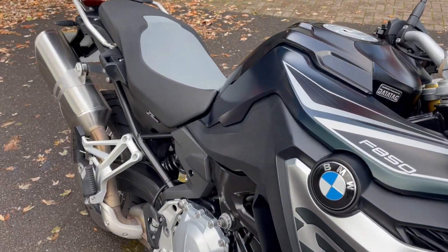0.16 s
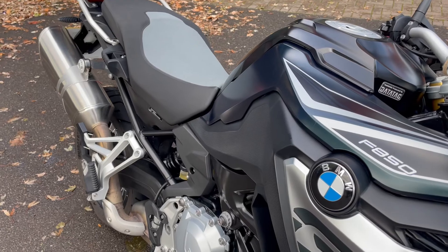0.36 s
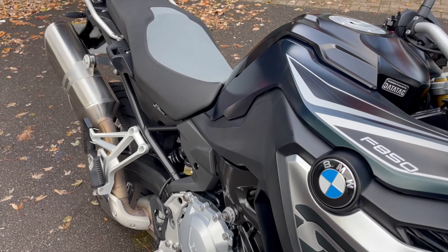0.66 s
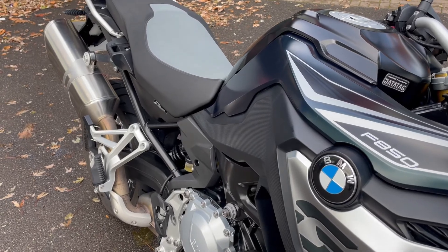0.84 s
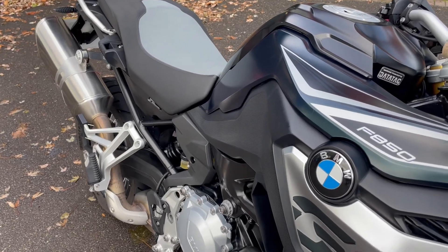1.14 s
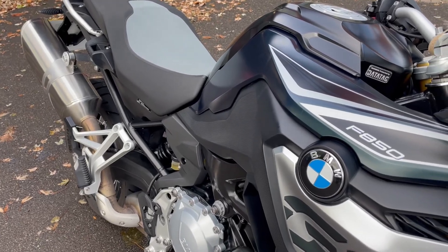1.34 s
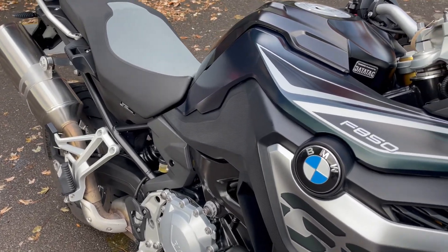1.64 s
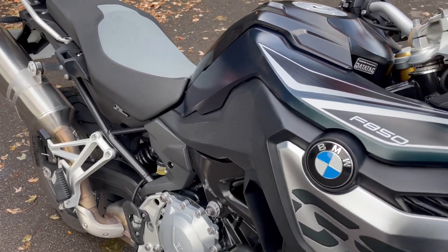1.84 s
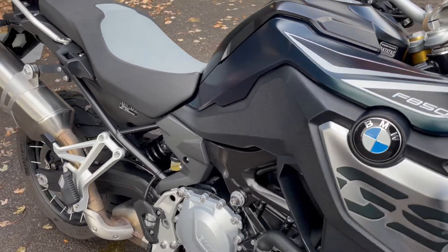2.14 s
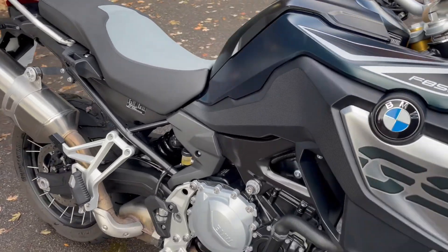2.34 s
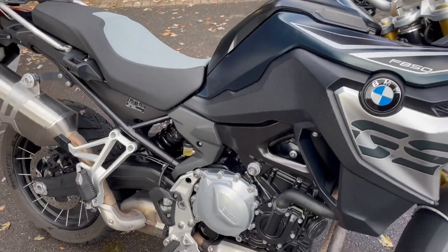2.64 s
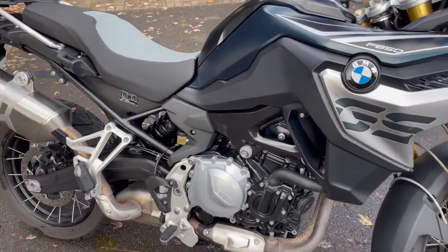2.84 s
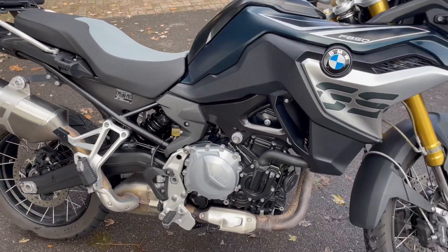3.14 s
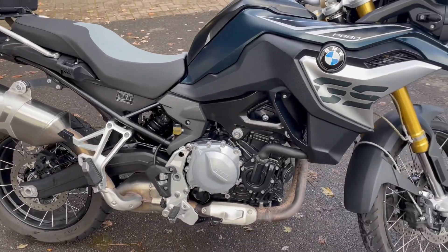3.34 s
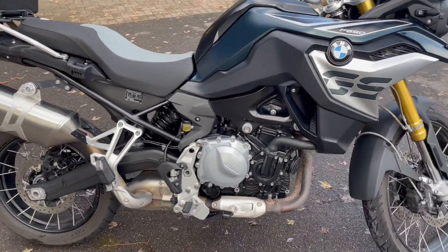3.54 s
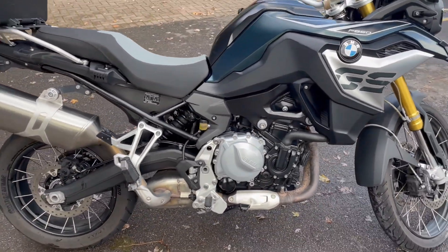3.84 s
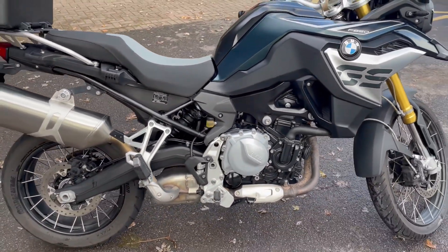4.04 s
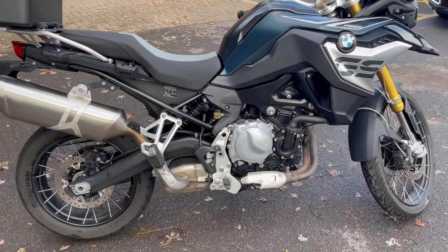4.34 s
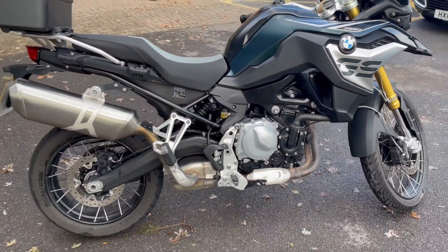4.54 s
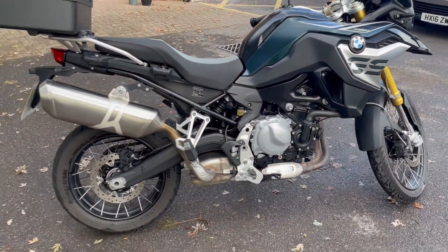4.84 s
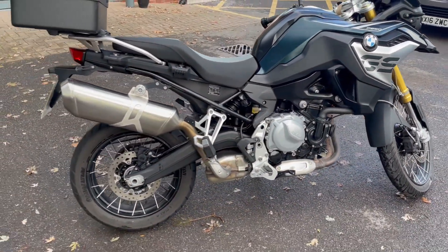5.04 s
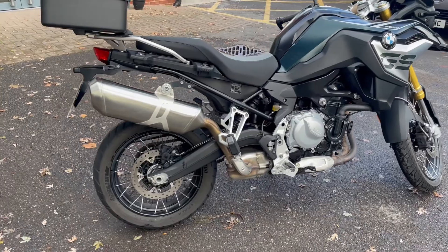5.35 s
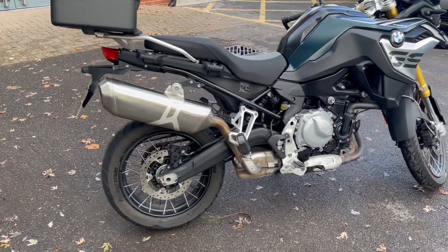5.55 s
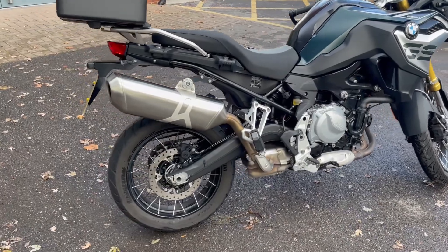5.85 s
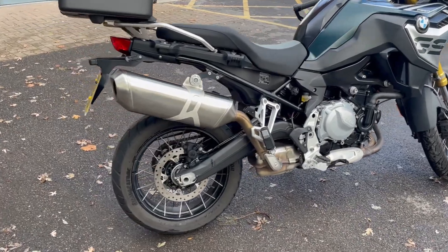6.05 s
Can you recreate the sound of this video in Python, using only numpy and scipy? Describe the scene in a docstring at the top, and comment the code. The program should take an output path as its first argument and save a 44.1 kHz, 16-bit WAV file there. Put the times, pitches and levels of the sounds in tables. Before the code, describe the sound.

Close outdoor motorcycle engine: two throaty revs in the first two seconds, falling back to uneven, thumping idle with metallic clatter and late faint squeals.

```python
"""A twin-cylinder motorcycle engine with uneven firing runs low, is blipped twice and falls back to idle.
Exhaust blows ring the silencer, intake gulps the airbox and metal contacts the casing; gas puffs gate a hiss.
Three sharp spits accompany the blips and the fall of the revs, over a steady street noise.
As the listener steps back the casing changes colour and hollow bands of noise slide upward.
Late on, a thin fluttering squeal sounds twice from far away. Two close microphone ports listen throughout."""
import sys
import numpy as np
from scipy import signal
from scipy.fft import rfft, irfft, next_fast_len
from scipy.io import wavfile
from scipy.ndimage import uniform_filter1d

SR = 44100
rng = np.random.default_rng(int(sys.argv[2]) if len(sys.argv) > 2 else 0)


def wav_out(sig):
    """Save sig, one row per channel (or a flat mono array), as 16-bit PCM at SR to the path in sys.argv[1]."""
    wavfile.write(sys.argv[1], SR, np.round(np.clip(np.atleast_2d(sig).T, -1, 1) * 32767).astype(np.int16))


def makeup_ratio(level_db):
    """Linear amplitude ratio for a level in decibels (20 dB per factor of ten)."""
    decades = np.asarray(level_db, float) / 20
    return 10 ** decades


N = 272979
T = np.arange(N) / SR   # s

# crankshaft speed: (time [s], speed [turns per minute])
CRANK_SPEED = [(0.0, 1253.0), (0.12, 1242.0), (0.21, 1862.0), (0.301, 2495.0), (0.399, 3590.0),
               (0.583, 3075.0), (0.75, 2645.0), (1.053, 1688.0), (1.117, 2796.0), (1.279, 5073.0),
               (1.363, 5060.0), (1.45, 4543.0), (1.55, 4255.0), (1.745, 3568.0), (1.9, 2966.0),
               (2.05, 2462.0), (2.214, 1816.0), (2.541, 1334.0), (2.713, 1268.0), (3.397, 1324.0),
               (3.714, 1264.0), (4.014, 1274.0), (4.558, 1200.0), (4.74, 1252.0), (5.009, 1211.0),
               (5.234, 1228.0), (5.586, 1170.0), (5.913, 1237.0), (6.19, 1240.0)]
IDLE_RPM = 1250
START_CYCLE = 0.812   # share of the four-stroke cycle already run at time zero
# throttle blips: (fully open at [s], opening time [s], held [s], closing time [s], strength [0-1])
BLIPS = [(0.327, 0.19, 0.0079, 0.098, 0.67), (1.172, 0.14, 0.043, 0.13, 0.85)]
OPENING_POWER = 0.69   # under 1: airflow grows fastest as the throttle first cracks open

# exhaust blows: (moment [share of cycle], level [dB])
FIRING = [(0.0, 3), (0.365, 4)]
# firings that stand out, weak or strong: (time [s], gain [dB])
ODD_FIRINGS = [(.38, -1), (.57, 3.5), (.65, 8), (1.075, -13), (1.1, 16), (1.19, -13), (1.225, 3),
               (1.28, -10), (1.84, -5), (1.93, 4), (2.13, 8), (2.31, -8), (2.46, -10), (4.13, -16),
               (4.32, -8), (4.52, -13), (4.72, -8), (4.91, -20), (5.205, -5)]
# silencer chambers behind the baffle, lowest first: (frequency [Hz], width [Hz], level [dB])
CHAMBERS = [(66.5, 9.2, 28), (86.8, 10.14, 27.5), (117.4, 4.1, 11)]
# further gain of the lowest chamber, which swells as the revs fall: (time [s], gain [dB])
OVERRUN = [(.45, -4.5), (.65, 6.5), (.9, 0.5), (1.05, -12), (1.45, 2.5), (2.1, -3), (2.45, -1), (2.8, -9)]
# thin rings of the header pipes:
# (frequency [Hz], width [Hz], level beside the tank [dB], two steps back [dB], four steps back [dB])
HEADER_PIPES = [(167.5, 11.6, 13, 13, 7), (290.6, 6.4, 8, 11, 7.5)]
# exhaust thump at the listener, throttle aside: (time [s], level [dB])
THUMP = [(0, -16), (0.1, -12), (0.2, -13), (0.38, -14.5), (0.46, -11), (0.6, -10.5), (0.8, -11),
         (1.03, -17), (1.085, -11), (1.11, -20), (1.16, -11), (1.31, -25), (1.39, -12), (1.55, -14),
         (1.7, -12), (2.1, -18), (2.5, -20.5), (3.1, -17.5), (5.4, -16), (6.19, -13.5)]
BAFFLE_HZ = 37.7, 151.8   # band that the baffle lets through
HEADER_LEAD_S = 0.00599   # the header pipes ring before the gas reaches the silencer
RASP_HZ, RASP_DB = (238, 201), (-14.5, 0)   # (frequency, width) [Hz]; gain at low and high revs [dB]

# intake strokes: (moment [share of cycle], level [dB])
GULPS = [(0.223, 1.5), (0.362, -30), (0.578, -3.5), (0.972, -4.5)]
# airbox resonances: (frequency [Hz], width [Hz], level [dB])
AIRBOX = [(179, 116, -7), (244, 42, -1), (317.4, 26.6, 3), (423, 96, -4), (544, 270, -9), (893, 430, -12),
          (1208, 450, -13.5)]

# contacts of valve gear and pistons: (moment [share of cycle], level [dB])
CONTACTS = [(0.02, -5), (0.125, 0), (0.365, -2.5), (0.495, -5), (0.68, -5.5), (.838, 3)]
# casing resonances:
# (frequency [Hz], width [Hz], level beside the tank [dB], two steps back [dB], four steps back [dB])
CASING = [(674, 75, -8.5, -0.5, -6.5), (1217, 890, -9.5, -0.5, -10.5), (1420, 135, -5, 5.5, -5.5),
          (1673, 203, -2, 2, -3), (1886, 247, -0.5, 7.5, -2.5), (2140, 213, -2.5, 4.5, -8.5),
          (2225, 60, 0, 5, 0), (2350, 200, -7.5, -0.5, -5), (2587, 72, 0, 7.5, -10),
          (2646, 134, -2.5, 2, -14.5), (2826, 130, -2.5, 3.5, -5.5), (3290, 370, -6.5, 2, -8),
          (4700, 2700, -18, -14.5, -16.5), (5535, 780, -10.5, 2, -17), (5400, 2800, -15.5, -1.5, -25),
          (7110, 550, -9.5, -1.5, -19)]
# thin metallic rings of the covers:
# (frequency [Hz], width [Hz], level beside the tank [dB], two steps back [dB], four steps back [dB])
COVERS = [(1423, 26, -1.5, 2, -7.5), (1684.4, 70, 3.5, 2, -6.5), (1971, 33, 0.5, 6.5, -4),
          (2635, 62, -1.5, 5, -9)]
# brief swell of the valve-gear rattle: (time [s], gain [dB])
RATTLE_SWELL = [(4.45, 0), (4.8, 2), (5.1, 2), (5.4, 0)]
GEAR_TEETH, GEAR_BLUR_HZ = 31.0, 400   # tooth contacts per crank turn; half width of the whirr

# gas leaving the tailpipe: (moment [share of cycle], level [dB])
PUFFS = [(.16, 0), (.515, 2.5), (.855, -7.5)]
# spectrum of the jet noise: (frequency [Hz], relative density [dB per Hz])
HISS_SPECTRUM = [(4000, 0), (6500, -6.5), (8500, -2), (11000, -7.5), (12500, -8.5), (13700, -8),
                 (15500, -10)]

# spectrum of the street: (frequency [Hz], relative density [dB per Hz])
STREET_SPECTRUM = [(30, 19.5), (120, -20), (400, -14), (1000, -15), (3000, -46), (8000, -8.5)]
STREET_DB = -43

# single sharp spits of gas from the tailpipe: (time [s], level [dB])
SPITS = [(.206, -37), (1.177, -19), (2.322, -43)]
SPIT_HZ, SPIT_FALL_S = (13600, 2500), 0.013   # (frequency, width) [Hz]; decay time

STEP_BACK_S = 2.1, 3.2, 5.2   # beside the tank, two steps back, four steps back
CASING_LAG_S = 0, 0, 0.0015   # the casing ends up farther away than the tailpipe
# engine body as the listener steps back: (time [s], gain [dB])
RECEDE = [(0, -0.5), (.5, 2.5), (1.05, -3), (1.4, 1), (1.75, -4), (2.5, -7.5), (3.0, -6.5), (6.19, -7.5)]
# hollow bands that slide upward as the listener steps back:
# (start [s], top reached [s], end [s], first frequency [Hz], last frequency [Hz], level [dB])
HOLLOW = [(2.706, 3.348, 3.58, 792.5, 876, -41.5), (4.355, 5.493, 6.5, 616, 703, -45.5)]
# shakes of the hollow bands: (moment [share of cycle], level [dB])
HOLLOW_SHAKES = [(.07, 0.5), (.72, -6)]
HOLLOW_FADE_DB_PER_S = 48   # before the start and after the end

# far brake, two grips: (start [s], swell [s], hold [s], fade [s], level [dB])
SQUEAL_GRIPS = [(5.363, 0.3, 0.15, .03, -44), (5.835, 0.035, 0.054, .05, -49)]
SQUEAL_HZ, SQUEAL_RANGE_DB = 12945, 11   # the swell starts and the fade ends this far below the hold

# colour of the ports: (frequency [Hz], left-right difference [dB], scattered share [dB])
PORT_COLOUR = [(60, -1.3, -24), (244, -2.2, -17), (800, 0.2, -2), (1740, -1.3, -5.5), (2900, 3.5, -4.5),
               (5000, 1.5, -4.5), (7000, 2, -10), (8000, 0, -25), (9200, 0, -25), (9930, 0, -2),
               (12700, -0.5, -11), (16000, -1.5, -69)]
# phase between the ports: (frequency [Hz], lead of the left port [rad])
PORT_LEAD = [(0, .1), (150, .25), (300, .35), (860, .4), (1700, .1), (2800, .8), (4900, .65), (5800, -1.3),
             (7900, -3.0), (9300, -3.3), (12500, -6.0), (15500, -6.4)]

# levels at idle with the throttle shut, dB gained per dB of speed, dB gained at full throttle
EXHAUST_OPEN_DB = 7
INTAKE_DB, INTAKE_FOLLOWS, INTAKE_OPEN_DB = -33, 0.51, 22
CLATTER_DB, CLATTER_FOLLOWS, CLATTER_OPEN_DB = -25, 0.31, 4
HISS_DB, HISS_FOLLOWS, HISS_OPEN_DB = -34.5, 0.66, 5.5


def rms_one(x):
    """Normalises a signal to unit effective value."""
    return x / np.sqrt(np.mean(x ** 2) + 1e-20)


def white():
    """Gaussian noise has equal power at all frequencies."""
    return rng.standard_normal(N)


def in_time(rows):
    """Interpolates table columns linearly along the time axis."""
    s, *columns = np.transpose(rows)
    return [np.interp(T, s, c) for c in columns]


def stepping_back(levels_db):
    """Gain that changes with the listener's distance."""
    return makeup_ratio(np.interp(T, STEP_BACK_S, levels_db))


def butterworth(x, order, hz, kind="low"):
    """Maximally flat filter."""
    return signal.sosfilt(signal.butter(order, hz, kind, fs=SR, output="sos"), x)


def resonance(x, hz, width_hz):
    """A damped oscillator: two poles, with gain 1 at the peak."""
    r = np.exp(-np.pi * width_hz / SR)
    poles = [1, -2 * r * np.cos(2 * np.pi * hz / SR), r * r]
    return signal.lfilter([(1 - r * r) / 2, 0, (r * r - 1) / 2], poles, x)


def coloured(spectrum):
    """Steady noise shaped by a power spectrum, with unit rms."""
    hz, db = np.transpose(spectrum)
    grid = np.fft.rfftfreq(N, 1 / SR) + 1
    gain = makeup_ratio(np.interp(np.log(grid), np.log(hz), db, -80, -80))
    return rms_one(irfft(rfft(white()) * gain, N))


def evened(x, span_s):
    """Divides out the slow power envelope, so that the rms stays near 1."""
    span = int(span_s * SR)
    power = uniform_filter1d(uniform_filter1d(x * x, span), span)
    return x / np.sqrt(power + 1e-12)


def each_cycle(cycle, table, spread_db, jitter_s):
    """Periodic excitation: one click per table row and engine cycle, scattered in time and level."""
    clicks = np.full(N, 1e-18)
    for share, db in table:
        at = np.flatnonzero(np.diff(np.floor(cycle - share)))
        chance = rng.standard_normal((200, 2))[:len(at)]
        at = np.clip(at + (chance[:, 0] * jitter_s * SR).astype(int), 0, N - 1)
        clicks[at] += makeup_ratio(db + spread_db * chance[:, 1])
    return clicks


def bursts(clicks, rise_s, fall_s, base_db):
    """Envelope that swells exponentially at every click and dies away to a steady base."""
    for tau in (rise_s, fall_s):
        clicks = signal.lfilter([1], [1, -np.exp(-1 / (tau * SR))], clicks)
    return clicks / (rise_s * SR) + makeup_ratio(base_db)


def throttle():
    """Airflow follows a power law of the valve opening, which ramps up and down at each blip."""
    opening = 0
    for s, rise, held, fall, strength in BLIPS:
        ramp = np.interp(T, [s - rise, s, s + held, s + held + fall], [0, 1, 1, 0])
        opening = opening + strength * ramp ** OPENING_POWER
    return opening


def odd_firings():
    """Unequal combustion: the gain on the blows dips or swells briefly at listed times."""
    return makeup_ratio(sum(db * np.exp(-((T - s) / 0.021) ** 2) for s, db in ODD_FIRINGS))


def exhaust(cycle, rpm):
    """Impulsive gas blows, low-passed by the baffle, excite chamber and header-pipe resonances."""
    blows = odd_firings() * each_cycle(cycle, FIRING, spread_db=1.0, jitter_s=0.0003)
    blows[0] = makeup_ratio(3.0)   # an earlier blow is still ringing
    dull = butterworth(blows, 2, BAFFLE_HZ[0], "high")
    dull = butterworth(dull, 6, BAFFLE_HZ[1])
    lowest, *upper = [makeup_ratio(db) * resonance(dull, hz, width) for hz, width, db in CHAMBERS]
    thump = dull + makeup_ratio(in_time(OVERRUN)[0]) * lowest + sum(upper)
    # advancing the running sum makes the blows about 6 ms earlier, interpolating between samples
    early = np.interp(T + HEADER_LEAD_S, T, np.cumsum(blows))
    early = np.diff(early, prepend=early[0])
    for k, (hz, width, *db) in enumerate(HEADER_PIPES):
        thump = thump + stepping_back(db) * resonance(early, hz, width) * (-1) ** (k + 1)
    # upper firing partials that pass the baffle
    rasp = resonance(resonance(blows, *RASP_HZ), *RASP_HZ)
    thump = thump + makeup_ratio(np.interp(rpm, [1400, 3000], RASP_DB)) * rasp
    return evened(thump, span_s=0.13)


def intake(cycle, rpm):
    """Suction pulses and the turbulence that follows them excite the airbox modes."""
    gulps = each_cycle(cycle, GULPS, spread_db=2.5, jitter_s=0.00044)
    turbulence = white() * bursts(gulps, 0.0034, 0.0061, base_db=1.0)
    air = rms_one(gulps) * makeup_ratio(1.5) + turbulence
    growl = makeup_ratio(np.interp(rpm, [2900, 3900], [-5.0, 5.0]))   # the two lowest modes gain at high revs
    rings = 0
    for k, (hz, width, db) in enumerate(AIRBOX):
        mode = makeup_ratio(db) * resonance(air, hz, width) * (-1) ** k
        rings = rings + mode * (growl if k < 2 else 1)
    return evened(rings, span_s=0.045)


def clatter(cycle, rpm):
    """Impact excitation: noisy metal knocks and the whirr of chain and gears ring casing and covers."""
    late = np.interp(T, STEP_BACK_S, CASING_LAG_S) * rpm / 120   # share of a cycle
    knocks = each_cycle(cycle - late, CONTACTS, spread_db=1.5, jitter_s=0.0003)
    drive = white() * bursts(knocks, 0.0005, 0.0025, base_db=-5.5) * makeup_ratio(-5.0)
    # a noise pattern that is the same at every knock
    age = np.arange(600) / SR
    rattle = rng.choice([-1, 1], len(age)) * (1 - np.exp(-age / 0.0005)) * np.exp(-age / 0.0013)
    drive = drive + makeup_ratio(8.0) * signal.fftconvolve(knocks, rattle)[:N]
    # gear whirr, heard at high revs: a blurred tone at the tooth rate
    blur = rms_one(butterworth(white(), 2, GEAR_BLUR_HZ))
    whirr = blur * np.sin(2 * np.pi * 2 * GEAR_TEETH * cycle)   # two crank turns a cycle
    drive = drive + makeup_ratio(np.interp(rpm, [2500, 3500, 5000], [-30.0, -14.0, -13.0])) * whirr
    rings = 0
    for k, (hz, width, *db) in enumerate(CASING):
        rings = rings + stepping_back(db) * resonance(drive, hz, width) * (-1) ** k
    shiver = white() * bursts(knocks, 0.0007, 0.003, base_db=-6.0) * makeup_ratio(-3.0)
    for hz, width, *db in COVERS:
        rings = rings + stepping_back(db) * resonance(shiver, hz, width)
    return evened(rings, span_s=0.082)


def hiss(cycle):
    """Jet noise: bright turbulence, amplitude-modulated by the gas puffs."""
    puffs = each_cycle(cycle, PUFFS, spread_db=2.2, jitter_s=0.00067)
    gate = bursts(puffs, 0.0019, 0.0047, base_db=-17.5)
    gate = uniform_filter1d(gate, int(0.0083 * SR))
    return evened(coloured(HISS_SPECTRUM) * gate, span_s=0.037)


def street():
    """Stationary background noise with a fixed spectrum."""
    return makeup_ratio(STREET_DB) * coloured(STREET_SPECTRUM)


def spits():
    """Transient jets: bright noise with a sudden start and an exponential decay."""
    shape = sum(makeup_ratio(db) * (T > s) * np.exp(-np.maximum(T - s, 0) / SPIT_FALL_S) for s, db in SPITS)
    return shape * rms_one(resonance(white(), *SPIT_HZ))


def hollow(cycle):
    """Narrow-band noise on gliding carriers, amplitude-modulated twice a cycle."""
    shakes = each_cycle(cycle, HOLLOW_SHAKES, spread_db=2.0, jitter_s=0.002)
    shake = bursts(shakes, 0.0026, 0.0057, base_db=-7.5)
    band = evened(butterworth(white(), 2, 35.0), span_s=0.03)
    glides = 0
    for start, top, end, first_hz, last_hz, db in HOLLOW:
        outside_s = np.maximum(0, np.maximum(start - T, T - end))
        phase = 2 * np.pi * np.cumsum(np.interp(T, [start, top], [first_hz, last_hz])) / SR
        glides = glides + makeup_ratio(db - HOLLOW_FADE_DB_PER_S * outside_s) * np.sin(phase)
    return np.sqrt(2) * rms_one(band * shake) * glides


def squeal():
    """Stick-slip friction: a thin tone whose level flutters as the lining grips and slips."""
    grip = 0
    for start, swell, hold, fade, db in SQUEAL_GRIPS:
        corners = np.cumsum([start - 0.03, 0.03, swell, hold, fade, 0.03])
        shape_db = np.interp(T, corners, [-60, -SQUEAL_RANGE_DB, 0, 0, -SQUEAL_RANGE_DB, -60])
        grip = grip + makeup_ratio(db + shape_db)
    flutter = rms_one(butterworth(white(), 2, [12.0, 40.0], "band"))
    return np.sqrt(2) * grip * makeup_ratio(4.8 * flutter) * np.sin(2 * np.pi * SQUEAL_HZ * T)


def ports(x):
    """Direct sound reaches each port with its own phase, plus scatter that flickers as the hand moves."""
    size = next_fast_len(N + 8192)
    grid = np.fft.rfftfreq(size, 1 / SR)
    hz, tilt_db, scatter_db = np.transpose(PORT_COLOUR)
    tilt_db, scatter_db = np.interp(grid, hz, tilt_db), np.interp(grid, hz, scatter_db)
    side = np.array([[0.5], [-0.5]])   # left, right
    direct = rfft(x, size) * np.exp(1j * side * np.interp(grid, *np.transpose(PORT_LEAD)))
    # the first second is dropped while the filter settles
    flicker = butterworth(rng.standard_normal((2, N + SR)), 2, 8.0)[:, SR:]
    flicker = rms_one(np.tanh(2 * rms_one(flicker)))
    echoes = rng.standard_normal((2, 4096)) * np.exp(-np.arange(4096) / (0.02 * SR))
    echoes = echoes / np.sqrt(np.sum(echoes ** 2, axis=1, keepdims=True))
    scatter = rfft(x * flicker, size) * rfft(echoes, size) * makeup_ratio(scatter_db)
    return irfft(makeup_ratio(side * tilt_db) * (direct + scatter), size)[:, :N]


def scene():
    """Superposition of engine layers locked to one crank angle, street and squeal, heard at two ports."""
    rpm, = in_time(CRANK_SPEED)
    cycle = START_CYCLE + np.cumsum(rpm) / (120 * SR)   # two turns a cycle
    speed_db = 20 * np.log10(rpm / IDLE_RPM)
    opening = throttle()
    far_db, = in_time(RECEDE)
    exhaust_db = in_time(THUMP)[0] + EXHAUST_OPEN_DB * opening
    intake_db = INTAKE_DB + INTAKE_FOLLOWS * speed_db + INTAKE_OPEN_DB * opening + far_db
    clatter_db = CLATTER_DB + CLATTER_FOLLOWS * speed_db + CLATTER_OPEN_DB * opening + far_db
    clatter_db = clatter_db + in_time(RATTLE_SWELL)[0]
    hiss_db = HISS_DB + HISS_FOLLOWS * speed_db + HISS_OPEN_DB * opening + far_db
    engine = makeup_ratio(exhaust_db) * exhaust(cycle, rpm)
    engine = engine + makeup_ratio(intake_db) * intake(cycle, rpm)
    engine = engine + makeup_ratio(clatter_db) * clatter(cycle, rpm)
    engine = engine + makeup_ratio(hiss_db) * hiss(cycle)
    engine = engine + spits() + hollow(cycle)
    return ports(engine + street() + squeal())


def band_limit(x):
    """A steep low-pass at the top of the band."""
    return signal.sosfilt(signal.butter(12, 15770, fs=SR, output="sos"), x)


def record(dry):
    """Soft saturation rounds the loudest peaks."""
    mix = np.tanh(dry)
    return band_limit(mix)


dry = scene()
out = record(dry)
wav_out(out)
```